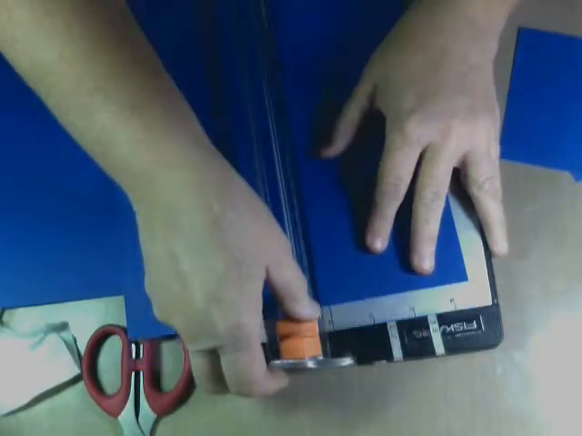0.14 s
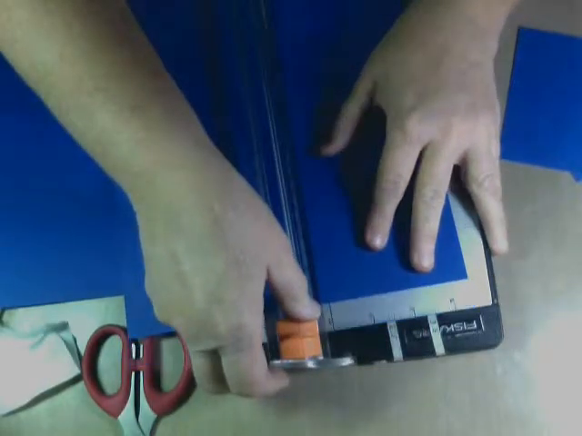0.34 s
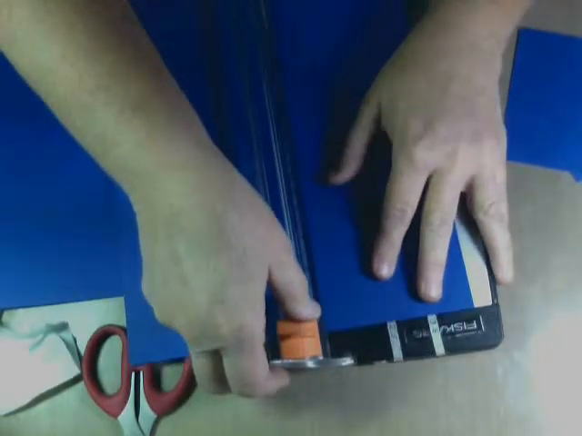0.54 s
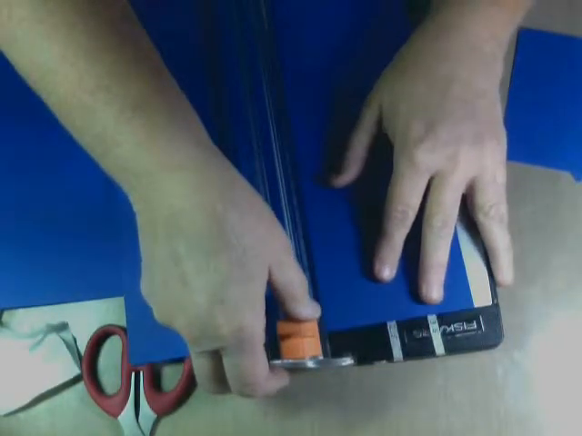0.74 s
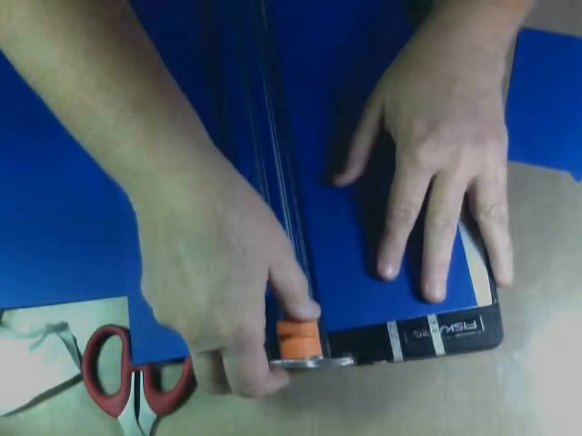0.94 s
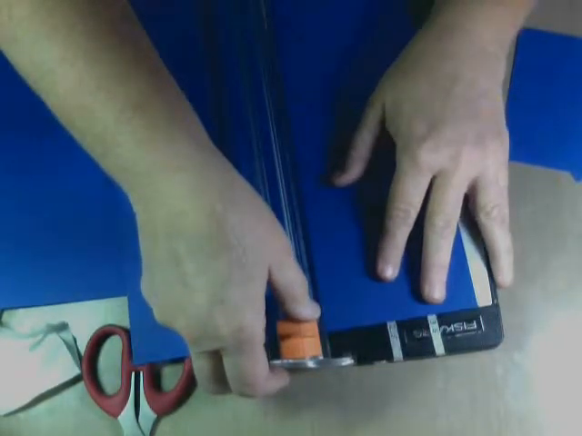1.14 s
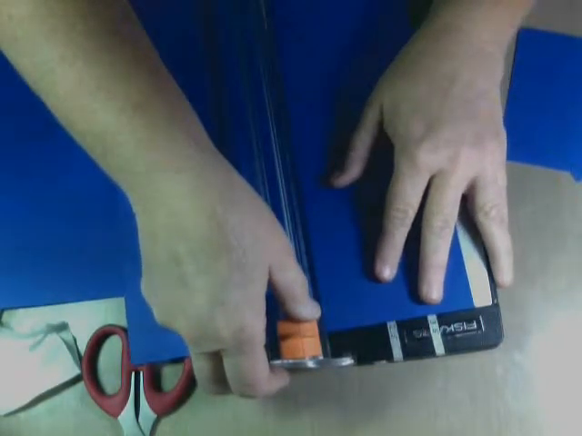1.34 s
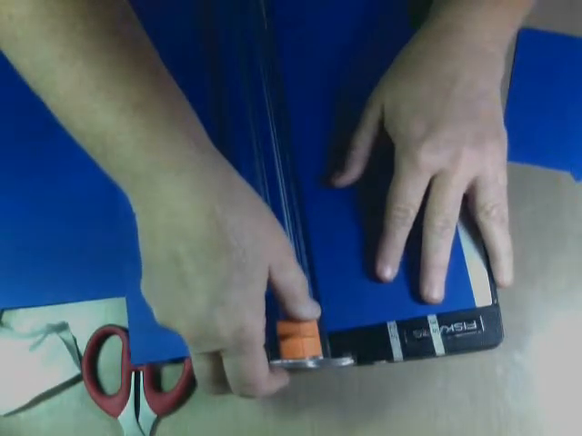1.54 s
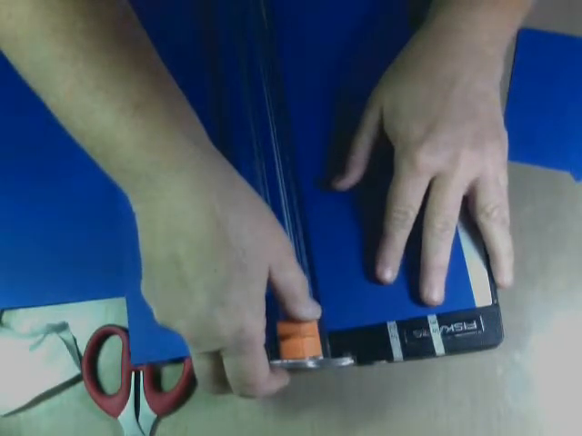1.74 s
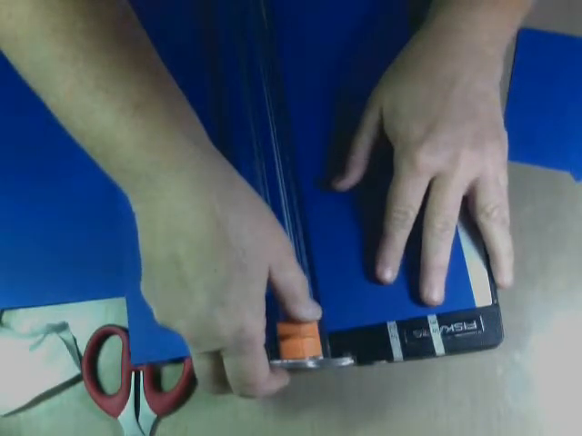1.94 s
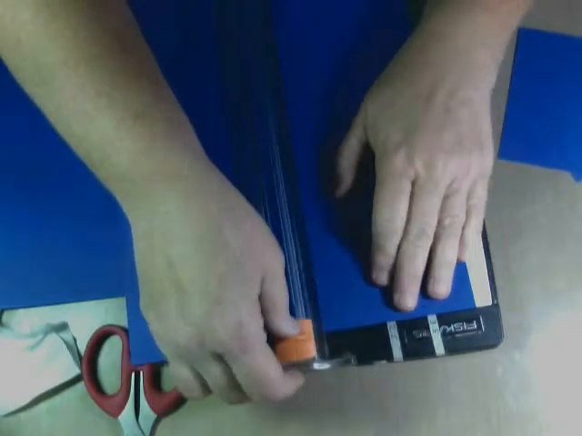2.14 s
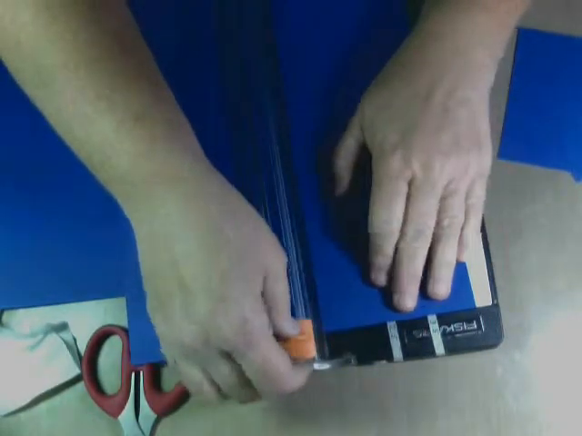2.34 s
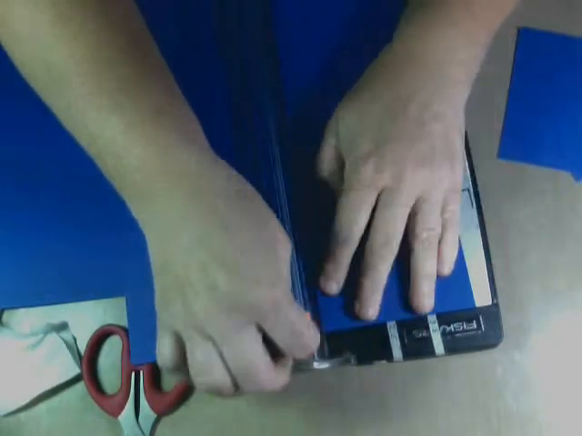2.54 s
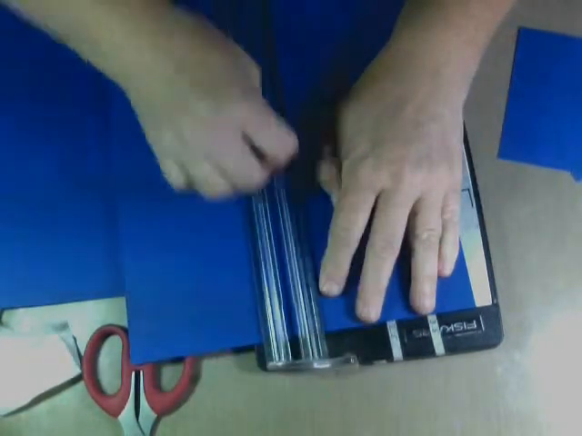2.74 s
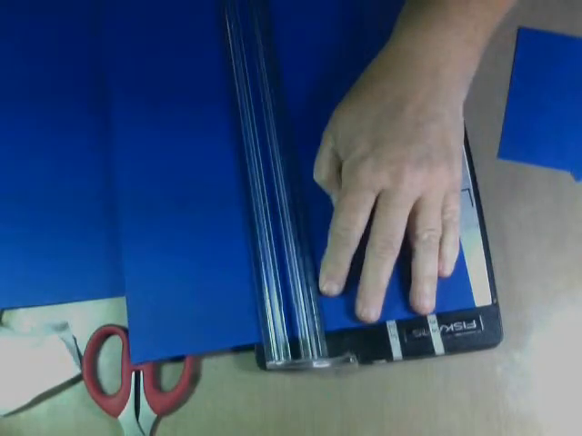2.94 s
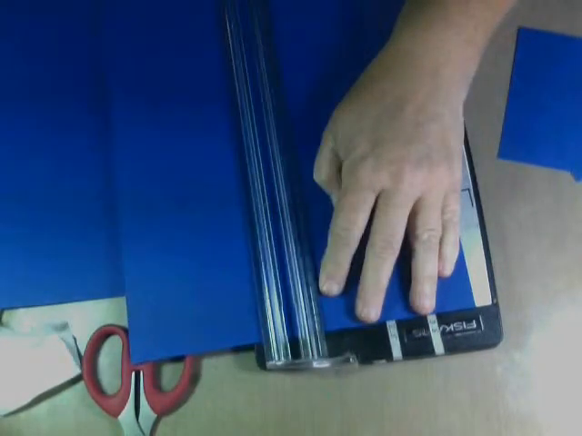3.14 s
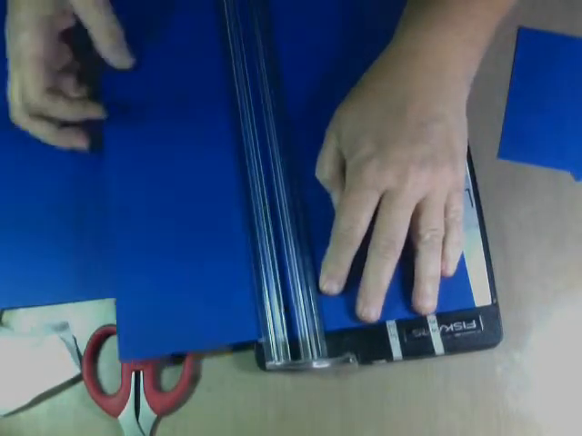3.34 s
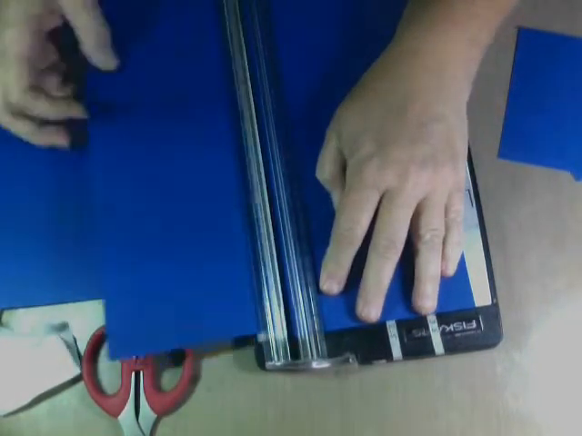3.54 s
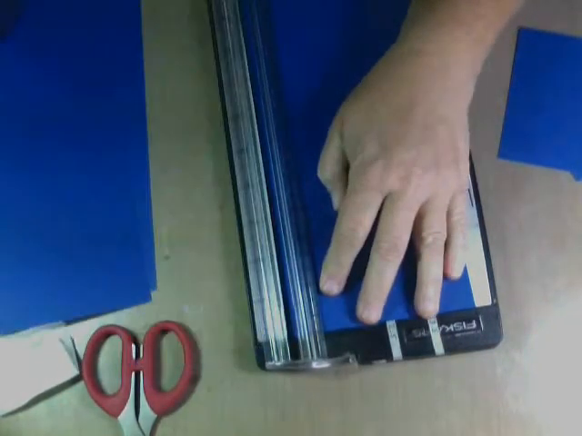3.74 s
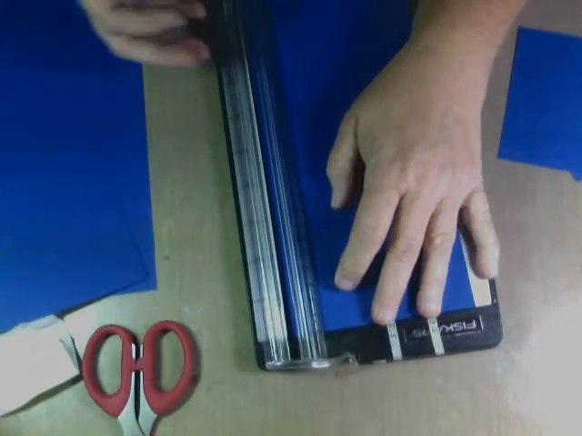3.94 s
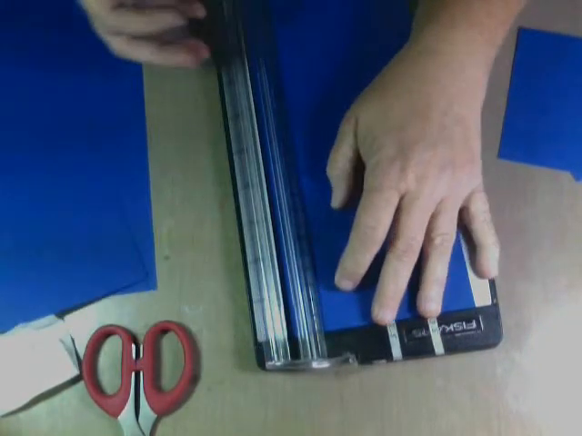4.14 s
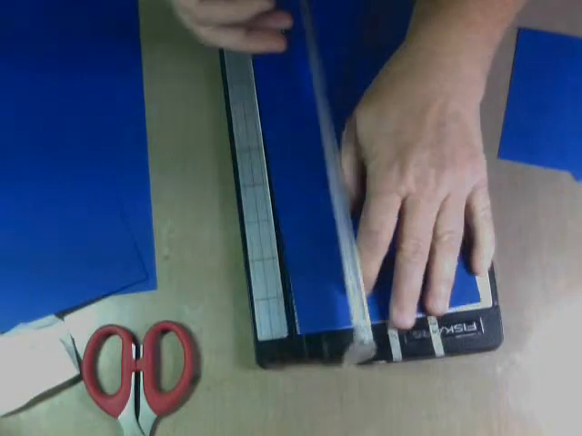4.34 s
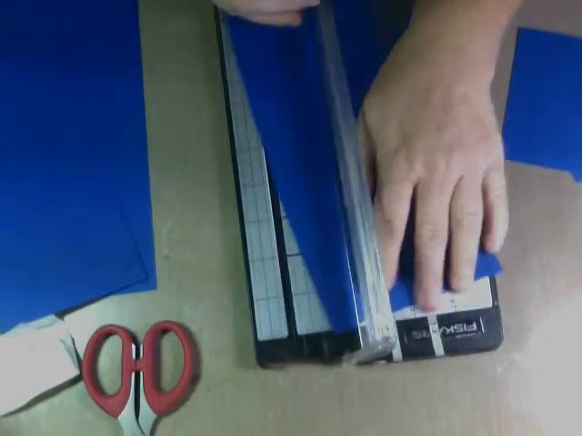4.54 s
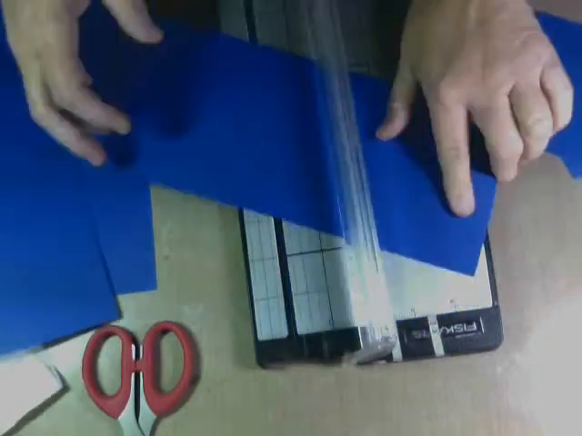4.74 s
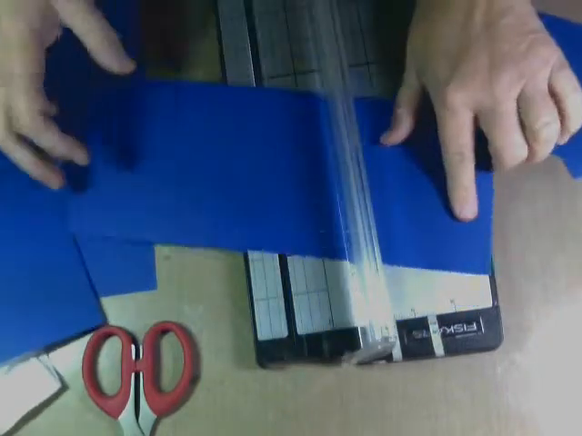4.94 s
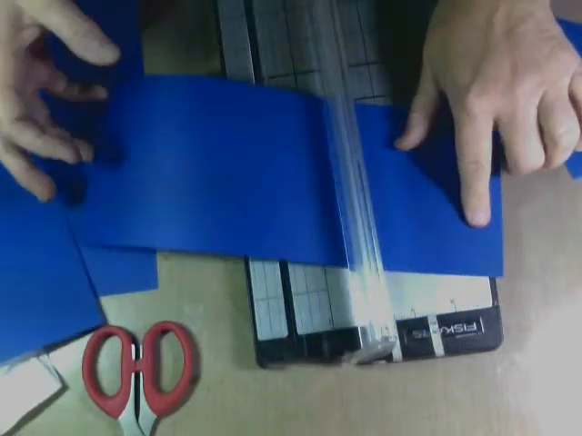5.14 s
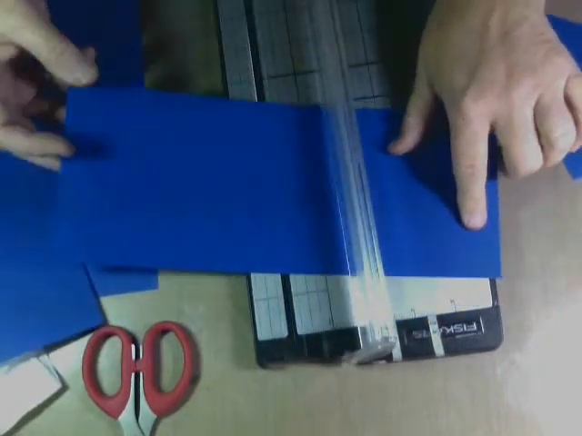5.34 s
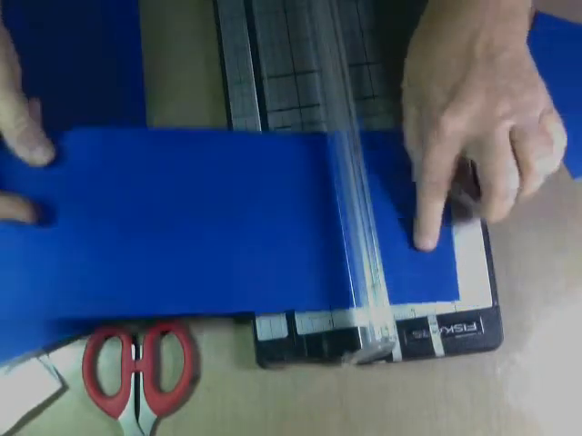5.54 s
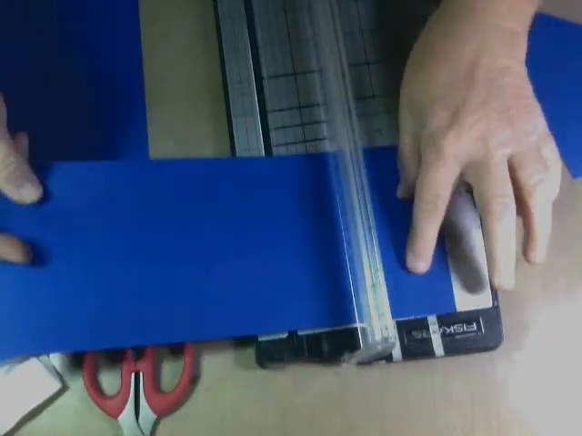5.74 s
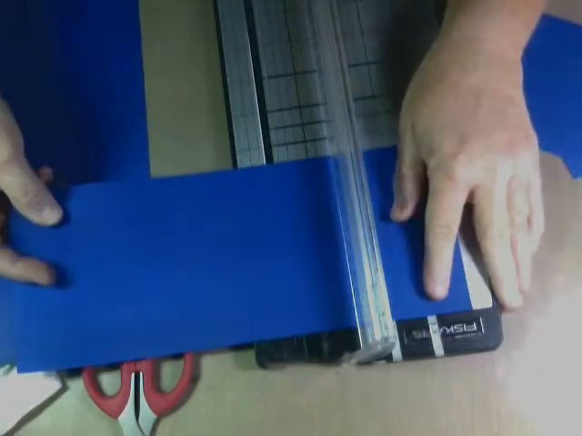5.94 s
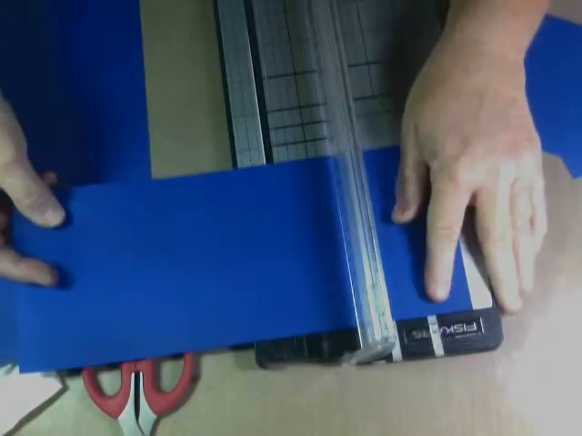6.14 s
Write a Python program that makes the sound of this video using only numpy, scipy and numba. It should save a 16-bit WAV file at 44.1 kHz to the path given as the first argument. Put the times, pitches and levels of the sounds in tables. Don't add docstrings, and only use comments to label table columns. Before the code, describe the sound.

Close-up card cutting at a table: faint rubbing, a rail knock, a quick zipping slice ending in a bang, then sliding card and a sharp slap.

```python
import sys
import numpy as np
from scipy import signal
from scipy.fft import rfft, irfft, next_fast_len
from scipy.io import wavfile
from scipy.ndimage import uniform_filter1d
from numba import njit

SR = 44100
rng = np.random.default_rng(int(sys.argv[2]) if len(sys.argv) > 2 else 0)


def transcribe(u):
    v = np.clip(np.atleast_2d(u).T, -1, 1)
    q = np.round(v * 32767).astype(np.int16)
    wavfile.write(sys.argv[1], SR, q)


def amplitude_ratio(level_db):
    exponent = np.asarray(level_db, float) / 20
    return 10 ** exponent


N = 272670
SILENT_DB = -200.0


def level(x, db=0):
    return x * amplitude_ratio(db) / np.sqrt(np.mean(x ** 2))


def band(x, lo_hz, hi_hz):
    return signal.sosfilt(signal.butter(2, [lo_hz, hi_hz], "band", fs=SR, output="sos"), x)


def colour(x, points):
    hz, db = np.transpose(points)
    n = next_fast_len(len(x))
    f = np.arange(n // 2 + 1) * SR / n + 1
    gain = amplitude_ratio(np.interp(np.log(f), np.log(hz), db))
    return irfft(rfft(x, n) * gain, n)[:len(x)]


def resonate(x, peaks):
    out = 0
    for k, (hz, width_hz, db) in enumerate(peaks):
        peak = signal.lfilter(*signal.iirpeak(hz, hz / width_hz, SR), x)
        out = out + (-1) ** k * amplitude_ratio(db) * peak
    return out


def resonate_twice(x, hz, width_hz):
    peak = [(hz, width_hz, 0)]
    return resonate(resonate(x, peak), peak)


def ring(x, modes):
    out = 0
    for hz, db, t60_s in modes:
        pole = np.exp(2j * np.pi * hz / SR - np.log(1000) / (t60_s * SR))
        out = out + amplitude_ratio(db) * signal.lfilter([1], [1, -pole], x).imag
    return out


def walk(rate_hz, n=N):
    hold = int(SR / rate_hz)
    steps = np.repeat(rng.standard_normal(N // hold + 1), hold)[:n]
    return 0.92 * uniform_filter1d(steps, hold)


def add(out, s, x):
    i = int(s * SR)
    out[i:i + len(x)] += x[:N - i]


def crack(t60_s, lo_hz, hi_hz, noise):
    decay = amplitude_ratio(-60 * np.arange(len(noise)) / SR / t60_s)
    return band(noise * decay, lo_hz, hi_hz)


def grit(per_s, spread_db, smooth, n=N):
    snaps = rng.random(n) < per_s / SR
    size = np.minimum(rng.exponential(size=n), 3.5)
    snaps = snaps * amplitude_ratio(spread_db * size) * rng.standard_normal(n)
    return level(snaps) + smooth * rng.standard_normal(n)


def patchy(x, db):
    n = next_fast_len(len(x))
    f = np.arange(n // 2 + 1) * SR / n + 1
    place = np.clip(2.5 * np.log2(f / 3000), 0, 6)
    spec, out = rfft(x, n), 0
    for k in range(7):
        share = np.clip(1 - abs(place - k), 0, 1)
        out = out + irfft(spec * share, n)[:len(x)] * amplitude_ratio(db * walk(20, len(x)))
    return out


def friction(span_s, levels_db, hiss, body, low, per_s, spread_db, smooth, judder_db, patchy_db):
    first = int(span_s[0] * SR)
    n = min(int(round(span_s[1] - span_s[0] + .6) * SR), N - first)
    judder = judder_db * walk(70, n)
    fizz = patchy(colour(grit(per_s, spread_db, smooth, n), hiss), patchy_db)
    plate = band(resonate(grit(per_s, spread_db, smooth, n), body), 1300, 8300)
    under = band(resonate(grit(per_s / 4, spread_db, smooth, n), low), 167, 2460)
    layers = np.array([level(fizz),
                       level(plate) * amplitude_ratio(1.5 * walk(40, n)),
                       level(under) * amplitude_ratio(2.7 * walk(39.95, n))])
    out = np.zeros(N)
    out[first:first + n] = np.sum(amplitude_ratio(levels_db[:, first:first + n] + judder) * layers, axis=0)
    return out


def strokes(rows, grip_db_s, let_go_db_s, drone_db, drone_per_weight):
    t, out = np.arange(N) / SR, np.full((3, N), SILENT_DB)
    for s, length_s, db, swell_db, weight_db in rows:
        hiss = db + swell_db * np.clip((t - s) / length_s, 0, 1)
        hiss -= grip_db_s * np.maximum(s - t, 0)
        hiss -= let_go_db_s * np.maximum(t - s - length_s, 0)
        drone = drone_db + drone_per_weight * weight_db
        out = np.maximum(out, hiss + np.array([[0], [weight_db], [drone]]))
    return out


def knock(blows, modes, lo_hz, hi_hz, hardness_hz=9000):
    out, noise = np.zeros(N), rng.standard_normal((len(blows), 2, 12000))
    for (s, db, chatter_s, crack_db, rattle_s), (force, fizz) in zip(blows, noise):
        body = ring(crack(chatter_s, 1.2 * modes[0][0], hardness_hz, force), modes)
        rattle = amplitude_ratio(crack_db - 13) * crack(rattle_s, lo_hz, hi_hz, fizz)
        add(out, s, amplitude_ratio(db) * (body / np.abs(body).max() + rattle))
    return out


# [f/Hz, level/dB rms]
MAINS_TONES = [(29.8, -51), (59.7, -48.5)]
# [f/Hz, width/Hz, level/dB rms]
FAN_ORDERS = [(28.5, 8.8, -58.5), (59.85, 8.2, -52), (90.2, 10, -50.5), (113.4, 15.5, -53),
              (140, 17.3, -50), (205.4, 22, -61)]
# [f/Hz, level/dB per Hz]
ROOM_AIR = [(4.7, -39), (8.0, -9), (65, -2.5), (87, -10.5), (145, -9.5), (175, -10), (212, -13), (282, -17),
            (341, -19), (516, -24), (605, -25.5), (1040, -27), (2090, -35), (16000, -44)]
ROOM_AIR_DB = -46.5


def room_tone():
    out = level(colour(rng.standard_normal(N), ROOM_AIR), ROOM_AIR_DB) * amplitude_ratio(.5 * walk(2.48))
    for hz, db in MAINS_TONES:
        phase = 2 * np.pi * hz * np.arange(N) / SR
        out += level(np.sin(phase + .5 * walk(2.0)), db)
    for hz, width_hz, db in FAN_ORDERS:
        out += level(resonate_twice(rng.standard_normal(N), hz, width_hz), db)
    return out


# [t/s, length/s, hiss level/dB, swell/dB, weight/dB]
NUDGE_STROKES = [
    (.055, .17, -57, 0.5, .5),
    (.5, 0.11, -60, 6, -1),
    (.62, .05, -54.5, -4, 1),
]
# [f/Hz, level/dB per Hz]
FIBRE_HISS = [(2350, -28.5), (4000, -7), (5250, -4), (6500, -2.5), (9900, 4), (12300, 2), (14500, -4),
              (16000, -7.5)]
# [f/Hz, width/Hz, level/dB]
RULER_PEAKS = [(2090, 114, 13.5), (2600, 130, -7), (3300, 230, 7.5), (3000, 8000, -1), (5300, 780, 5)]
# [f/Hz, width/Hz, level/dB]
TABLE_PEAKS = [(594, 620, 3.5), (857, 70, 10), (1150, 132, -0.5), (1526, 310, 5.5)]


def nudge_card():
    levels_db = strokes(NUDGE_STROKES, grip_db_s=350, let_go_db_s=400, drone_db=-9.5, drone_per_weight=0)
    return friction((0, .72), levels_db, FIBRE_HISS, RULER_PEAKS, TABLE_PEAKS, per_s=2500,
                    spread_db=1.7, smooth=2.2, judder_db=0.77, patchy_db=0.63)


# [t/s, length/s, level/dB, f/Hz]
CORNER_SQUEAKS = [(4.309, .014, -43.5, 1850), (4.545, .012, -47, 1750), (4.545, .01, -47, 3500),
                  (5.96, .08, -60, 5450), (5.28, .025, -50, 3000), (3.668, .02, -48, 2600),
                  (2.855, 0.025, -33, 1030), (4.097, 0.024, -42.5, 840), (4.313, .02, -37.5, 1150),
                  (4.314, .016, -48, 2400), (4.355, .026, -43, 940), (4.527, .028, -47.5, 870),
                  (4.57, .055, -55, 850), (4.915, .025, -46, 2100), (4.935, .03, -48, 1800),
                  (5.155, .045, -57, 1900), (5.225, .03, -55, 2200), (4.74, .045, -50, 3200),
                  (2.77, .05, -47, 1000), (2.695, .04, -48, 1400), (2.7, .05, -48, 3100),
                  (5.48, .084, -52, 5450), (5.59, .097, -55.5, 3200)]
# [t/s, length/s, level/dB, f/Hz]
BED_DRAGS = [(5.279, .026, -38.5, 2100), (2.62, .05, -55, 1100), (.673, .014, -44, 1400),
             (3.49, .065, -42, 800), (3.565, .085, -48, 520), (3.655, .05, -50, 900), (3.19, .03, -50, 480),
             (5.703, .025, -47, 1500), (4.262, .015, -54, 1100), (2.5, .075, -62, 2480),
             (2.875, .05, -37.5, 603), (2.922, 0.08, -38, 616), (3.606, 0.037, -39.5, 900),
             (4.331, 0.12, -49, 280), (4.31, .02, -43, 750), (4.335, .025, -48, 1200),
             (4.436, .025, -51, 800), (4.743, .02, -48, 800), (4.7, .04, -54, 2500), (4.36, .08, -48, 720),
             (2.72, .06, -44, 260), (3.6, .045, -48, 1500), (5.456, .024, -36, 900),
             (5.428, .014, -34, 1300), (4.34, .08, -49, 900), (4.412, .022, -41, 830),
             (4.835, .016, -44, 800), (5.425, .054, -43, 1800)]
# [t/s, length/s, level/dB, f/Hz]
BED_CATCHES = [(3.387, .016, -44, 1950), (3.494, .026, -41, 1980), (3.678, 0.017, -44, 1300),
               (3.766, 0.023, -44.5, 2780), (4.985, 0.024, -40, 2820), (5.039, 0.014, -40, 1800),
               (5.077, .017, -43, 2500), (5.383, .03, -38, 3000), (5.39, .022, -44, 1500),
               (3.51, .04, -44, 1400), (3.505, .012, -41, 2300), (5.15, .04, -52, 2000)]
# [t/s, length/s, level/dB, f/Hz]
CARD_SKIDS = [(5.39, .022, -58, 9500), (5.383, .03, -47, 4500), (3.09, .011, -39, 2000),
              (3.52, 0.022, -36, 2180), (3.577, .015, -44, 1790), (4.339, 0.014, -53, 3000),
              (4.558, .016, -49.5, 9000), (4.735, .035, -46, 3240), (4.8, 0.05, -42, 3300),
              (4.904, .025, -41.5, 2800), (5.417, .065, -51, 4500), (5.549, 0.014, -46, 3000)]


def slips(rub, hiss, rows, width_re_centre, hiss_db):
    out, t = np.zeros(N), np.arange(4096) / SR
    for s, length_s, db, hz in rows:
        i = int(s * SR)
        swell = np.sin(np.pi * np.clip(t / length_s, 0, 1)) ** 0.39
        drag = resonate_twice(rub[i:i + 4096], hz, width_re_centre * hz)
        add(out, s, amplitude_ratio(db) * swell * (level(drag) + amplitude_ratio(hiss_db) * hiss[i:i + 4096]))
    return out


def scuffs():
    rub = grit(2000, 2.6, 1.0) * amplitude_ratio(2.6 * walk(150))
    hiss = level(colour(rub, FIBRE_HISS))
    return (slips(rub, hiss, CORNER_SQUEAKS, 0.19, -25) + slips(rub, hiss, BED_DRAGS, 0.64, -25)
            + slips(rub, hiss, BED_CATCHES, 0.79, -10.5) + slips(rub, hiss, CARD_SKIDS, 1.05, -.2))


# [t/s, peak level/dB, main ring f/Hz, crack level/dB re peak]
FLAT_TAPS = [(.674, -36, 930, -27), (1.239, -55, 1060, 7), (2.253, -50.5, 790, 5.5), (2.62, -46, 1060, -6),
             (2.665, -31, 780, -12), (2.936, -26, 697, -15), (3.189, -27.5, 985, -24),
             (3.405, -30, 2010, -11), (4.111, -36, 1005, -23), (4.309, -32, 1160, -19),
             (4.564, -43, 884, -7), (4.908, -29.5, 1830, -23), (5.12, -38, 1200, -1), (5.466, -29, 840, -5),
             (5.699, -28, 780, -27), (5.708, -30, 720, -19), (5.714, -32.5, 781, -18)]
# [t/s, peak level/dB, main ring f/Hz, crack level/dB re peak]
RAPPED_TAPS = [
    (2.913, -19.5, 740, -15),
    (3.372, -30.5, 1205, -13),
    (3.487, -38, 2040, -9),
    (3.596, -31.5, 900, -29),
    (4.357, -40, 965, -20),
    (4.545, -33.5, 840, -16),
    (4.841, -32, 2170, -17),
    (5.328, -41.5, 1530, -18),
    (5.426, -28, 900, -13),
]
TAP_T60_S, TAP_DAMPING = .021, .6
FLAT_RAP_DB, EDGE_RAP_DB = -14.5, -5.5


def taps():
    rows = [(*r, FLAT_RAP_DB) for r in FLAT_TAPS] + [(*r, EDGE_RAP_DB) for r in RAPPED_TAPS]
    out, noise = np.zeros(N), rng.standard_normal((len(rows), 3, 4096))
    for (s, db, hz, crack_db, rap_db), (force, rap, fizz) in zip(rows, noise):
        t60_s = TAP_T60_S * (1000 / hz) ** TAP_DAMPING
        modes = [(0.786 * hz, -5, 0.34 * t60_s), (hz, 0, t60_s), (1.37 * hz, -6, 0.28 * t60_s)]
        body = ring(crack(0.021, 0.44 * hz, 6600, force), modes)
        rap = amplitude_ratio(rap_db + 7) * crack(.03, 1400, 3600, rap)
        fizz = amplitude_ratio(crack_db + 2) * crack(0.015, 3500, 11600, fizz)
        add(out, s, amplitude_ratio(db) * (body / np.abs(body).max() + rap + fizz))
    return out


# [t/s, level/dB, chatter t60/s, crack level/dB re blow, rattle t60/s]
RAIL_BLOWS = [
    (2.1908, -35.5, 0.0029, 23, 0.043),
    (2.1945, -12, 0.0031, -2, .02),
    (2.199, -20.5, 0.0038, 1, .03),
    (2.2035, -24, 0.0025, 2.5, 0.085),
]
# [f/Hz, level/dB, t60/s]
RAIL_MODES = [(360, -7.5, 0.13), (810, -2.5, 0.029), (970, 10, 0.017), (1200, -14, 0.016), (1415, -5, .02),
              (1904, -2.5, .025), (2100, -2.5, 0.028)]


def drop_rail():
    return knock(RAIL_BLOWS, RAIL_MODES, 1000, 12500)


# [t/s, peak level/dB, f/Hz]
EDGE_TICKS = [(2.621, -42, 3000), (3.4872, -28, 1600), (3.4962, -30, 2050), (3.499, -28, 5000),
              (3.511, -30, 2200), (3.5257, -26, 1650), (3.528, -26, 9000), (3.539, -28, 6000),
              (3.5555, -34, 1500), (3.5975, -31, 1400), (3.6584, -41, 8000), (3.688, -32, 1500),
              (3.7197, -38, 1530), (3.7695, -35, 2200), (3.782, -36, 10000), (4.7372, -37, 3300),
              (4.75, -32, 3300), (4.8086, -31, 3500), (4.822, -32, 3000), (4.843, -29, 1500),
              (4.879, -36, 1500), (4.911, -30, 1500), (4.997, -31, 3000), (5.043, -30, 1700),
              (5.082, -34, 2000), (5.1215, -33, 3500), (5.293, -35, 1800), (5.4127, -12, 3300),
              (5.4275, -26, 2700), (5.4408, -23, 5500), (5.4665, -30, 2200), (2.869, -31, 3000),
              (2.936, -30, 2000), (2.195, -20, 2200), (2.917, -27, 3500)]
TICK_CYCLES, TICK_SNAP_DB, TICK_SNAP_T60_S = 9, -3, .004


def ticks():
    out, noise = np.zeros(N), rng.standard_normal((len(EDGE_TICKS), 1024))
    for (s, db, hz), snap in zip(EDGE_TICKS, noise):
        snap = crack(TICK_SNAP_T60_S, 900, 14000, snap)
        body = ring(snap, [(hz, 0, TICK_CYCLES / hz)])
        snap = amplitude_ratio(TICK_SNAP_DB) * snap / np.abs(snap).max()
        add(out, s, amplitude_ratio(db) * (body / np.abs(body).max() + snap))
    return out


# [t/s, length/s, hiss level/dB at start, swell/dB by the end, weight on bed/dB]
RUB_STROKES = [(2.3, .37, -71, 4, 6), (3.545, .11, -60, -4, 4), (2.382, .08, -57, 3.5, -10),
               (2.51, 0.076, -54, -2.5, -5.5), (3.455, .03, -64, 3, -6), (3.497, .045, -49, 10, -2),
               (3.58, .01, -49, 2, -2), (3.66, .045, -51, -5, 4), (3.714, .071, -51, 2, 0),
               (3.85, .05, -64, -3, 9), (4.43, .1, -61.5, 14, -6.5), (4.535, 0.19, -44, 0, -13),
               (4.722, .016, -42, 2.5, -15), (4.746, 0.22, -45.5, -5, 0.5), (4.985, 0.094, -46, -1.5, 3),
               (5.085, .035, -58, 0, 0), (5.123, 0.18, -54, -6.5, 2), (5.468, 0.021, -42, -9, -2),
               (5.49, 0.067, -54, 9.5, 0), (5.575, .055, -51.5, -5.5, 1), (5.635, .1, -55.5, 3, 0),
               (5.75, 0.23, -62, -2.5, 3.5), (5.97, .06, -62, 6, -2), (6.04, .04, -60, -8, 2)]
# [f/Hz, width/Hz, level/dB]
BED_PEAKS = [(2030, 840, 2.5), (2280, 90, -0.5), (3000, 930, -6.5), (4600, 3500, -2.5), (5340, 630, 3)]


def rub_card():
    levels_db = strokes(RUB_STROKES, grip_db_s=950, let_go_db_s=900, drone_db=-5, drone_per_weight=0.67)
    return friction((2.3, 6.18), levels_db, FIBRE_HISS, BED_PEAKS, TABLE_PEAKS, per_s=2500,
                    spread_db=2.7, smooth=1.9, judder_db=1.25, patchy_db=2.2)


# [t/s, cutting hiss level/dB]
CUT_PUSH = [
    (2.68, -62),
    (2.7, -47),
    (2.751, -42.5),
    (2.815, -41),
    (2.828, -37.5),
    (2.914, -37),
    (2.95, -36.5),
    (3.055, -39.5),
    (3.064, -44),
    (3.09, -43),
]
RAIL_DB, RAIL_FADE_DB_S = 3, 37
RUMBLE_DB, RUMBLE_PEAK_S, RUMBLE_FADE_DB_S = -.4, 2.93, 45


def blade_levels():
    t, (s, db) = np.arange(N) / SR, np.transpose(CUT_PUSH)
    hiss = np.interp(t, s, db, SILENT_DB, SILENT_DB)
    rail = hiss + RAIL_DB - RAIL_FADE_DB_S * (t - s[0])
    rumble = hiss + RUMBLE_DB - RUMBLE_FADE_DB_S * abs(t - RUMBLE_PEAK_S)
    return np.array([hiss, rail, rumble])


# [f/Hz, level/dB per Hz]
BLADE_HISS = [(2350, -28), (4000, -3), (5600, 1), (7000, -1), (8400, 3.5), (10500, 4), (12100, 5.5),
              (13800, 0.5), (16000, -5)]
# [f/Hz, width/Hz, level/dB]
RAIL_PEAKS = [(2030, 440, -0.5), (3200, 890, 2.5), (4400, 1100, 0), (5840, 850, 0.5)]
# [f/Hz, width/Hz, level/dB]
CARRIAGE_PEAKS = [(300, 230, 1), (501, 94, 3), (600, 220, 3), (1030, 88, 5), (1360, 450, -1)]


def run_blade():
    return friction((2.675, 3.09), blade_levels(), BLADE_HISS, RAIL_PEAKS, CARRIAGE_PEAKS, per_s=3000,
                    spread_db=2.6, smooth=1.4, judder_db=1.4, patchy_db=2.2)


# [f/Hz, width/Hz, level/dB]
STEEL_PEAKS = [(3100, 150, 0), (4100, 170, -2), (4900, 170, 0), (6300, 200, -2), (8600, 250, 0),
               (10200, 300, -1), (12100, 350, 2)]
STEEL_DB = -17


def sing_blade():
    sing = 0
    for hz, width_hz, db in STEEL_PEAKS:
        mode = level(resonate(rng.standard_normal(N), [(hz, width_hz, 0)]), db)
        sing = sing + mode * amplitude_ratio(4.0 * walk(25))
    return sing * amplitude_ratio(blade_levels()[0] + STEEL_DB)


# [t/s, level/dB, chatter t60/s, crack level/dB re blow, rattle t60/s]
STOP_BLOWS = [
    (3.0953, -6.5, 0.0092, 13.7, 0.017),
    (3.0963, -6.5, 0.011, 11.8, 0.011),
    (3.0985, -11.5, 0.0083, 1, 0.15),
]
# [f/Hz, level/dB, t60/s]
STOP_RINGS = [(526, -11, 0.034), (700, -4, 0.035), (900, -11, 0.022), (1270, -8, 0.014), (1570, -4, 0.018),
              (2080, -0.5, 0.0099), (2970, -8, 0.0086), (4000, 3, 0.01), (4500, 3, 0.011),
              (5870, -0.5, 0.0083), (8440, 2.5, 0.0075)]


def hit_stop():
    return knock(STOP_BLOWS, STOP_RINGS, 690, 8500)


# [f/Hz, level/dB, t60/s]
TABLE_THUD = (3.1022, -14, 0.0012, [(133.6, 1, 0.17), (199.3, -4.5, .18), (267, -8, 0.13),
              (365, -5.5, 0.095)])


def thud():
    s, db, push_s, modes = TABLE_THUD
    push = np.sin(np.pi * np.clip(np.arange(20000) / (push_s * SR), 0, 1))
    out, body = np.zeros(N), ring(push, modes)
    add(out, s, amplitude_ratio(db) * body / np.abs(body).max())
    return out


# [t/s, level/dB, chatter t60/s, crack level/dB re blow, rattle t60/s]
SLAP_BLOWS = [
    (5.4065, -19.5, 0.0017, 7, .006),
    (5.4125, -10, 0.004, 9, 0.008),
    (5.4146, -4.5, 0.012, -22, 0.05),
    (5.4198, -5.5, 0.011, -25, 0.067),
    (5.4405, -20, 0.0019, 10, 0.0067),
]
# [f/Hz, level/dB, t60/s]
SLAP_RINGS = [(850, 4, 0.028), (1186, 10, 0.018), (1300, 2, 0.016), (1510, 1.5, 0.023), (1913, -0.5, .025),
              (2196, -6, 0.025), (3030, -6, 0.012), (3400, -23, 0.012)]
# [t/s, level/dB, chatter t60/s, crack level/dB re blow, rattle t60/s]
BOUNCE_BLOWS = [
    (5.432, -23, 0.021, -25, .02),
    (5.4448, -14, 0.015, -30, .02),
    (5.4475, -16.5, 0.0051, -30, .02),
    (5.4535, -19.5, .004, -30, .02),
    (5.46, -28, .015, -11, .02),
]
# [f/Hz, level/dB, t60/s]
BOUNCE_RINGS = [(640, -3, .03), (763, 1, 0.036), (893, -6, 0.031), (1167, -13, 0.033), (1700, -12, .02)]


def slap_card():
    slap = knock(SLAP_BLOWS, SLAP_RINGS, 1800, 7500, hardness_hz=3600)
    return slap + knock(BOUNCE_BLOWS, BOUNCE_RINGS, 1200, 5000, hardness_hz=1600)


ROOM_T60_S, ROOM_WET_DB = .25, -26


def echo(x):
    t = np.arange(SR // 3) / SR
    tail = rng.standard_normal(len(t)) * amplitude_ratio(-60 * t / ROOM_T60_S) * (t > .004)
    tail = signal.lfilter(*signal.butter(1, 5000, fs=SR), tail)
    tail = tail / np.sqrt(np.sum(tail ** 2))
    return amplitude_ratio(ROOM_WET_DB) * signal.fftconvolve(x, tail)[:N]


def scene():
    card = nudge_card() + rub_card() + scuffs() + slap_card()
    trimmer = drop_rail() + run_blade() + hit_stop() + thud()
    near = card + trimmer + taps()
    mono = near + echo(near) + room_tone() + ticks() + sing_blade()
    return np.tile(mono, (2, 1))


@njit
def follow(x, attack, release):
    e, y = 0., np.empty(len(x))
    for i in range(len(x)):
        e += (abs(x[i]) - e) * (attack if abs(x[i]) > e else release)
        y[i] = e
    return y


def band_limit(x):
    return signal.sosfilt(signal.butter(12, 17000, fs=SR, output="sos"), x)


AGC_TOP_DB, AGC_RATIO, AGC_ATTACK_S, AGC_RELEASE_S = -25, 1.25, 0.025, 0.38
TOP_HZ = 15950


def record(dry):
    env = follow(dry[0], 1 / (AGC_ATTACK_S * SR), 1 / (AGC_RELEASE_S * SR))
    gain = np.minimum(1, amplitude_ratio(AGC_TOP_DB) / (env + 1e-9)) ** (1 - 1 / AGC_RATIO)
    top_cut = signal.ellip(12, .3, 62, TOP_HZ, fs=SR, output="sos")
    mix = signal.sosfilt(top_cut, np.clip(dry * gain, -1, 1))
    return band_limit(mix)


dry = scene()
out = record(dry)
transcribe(out)
```